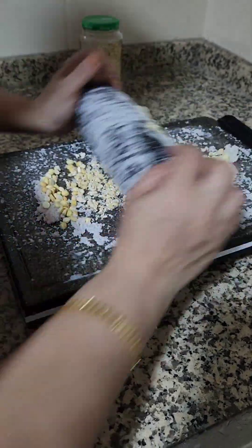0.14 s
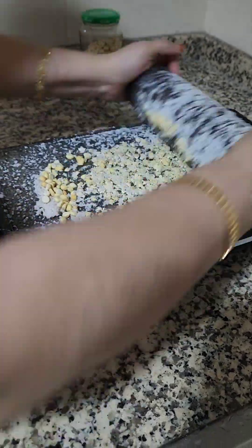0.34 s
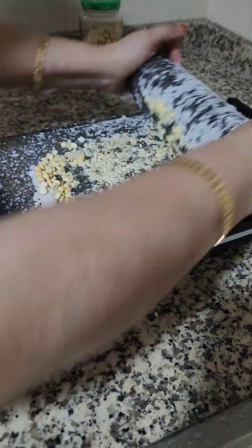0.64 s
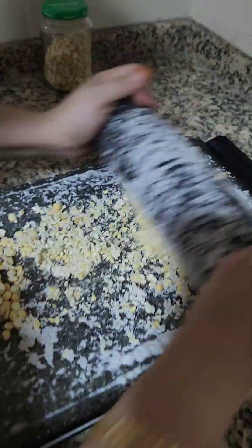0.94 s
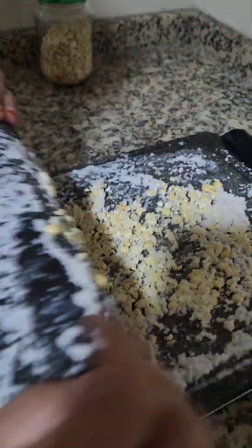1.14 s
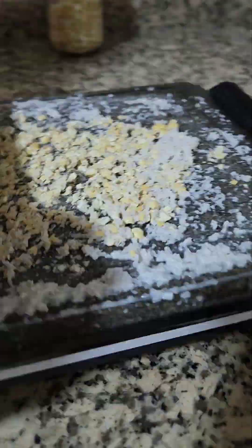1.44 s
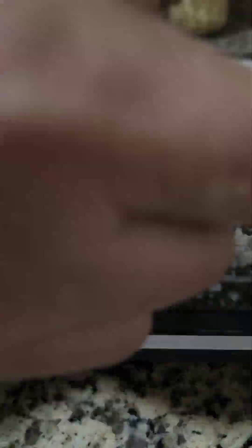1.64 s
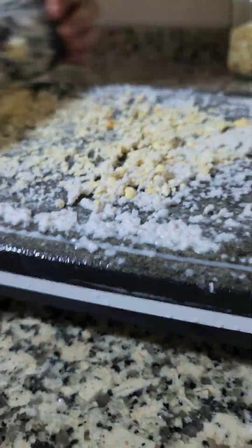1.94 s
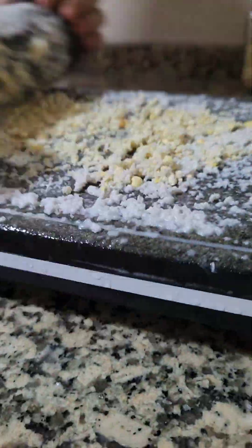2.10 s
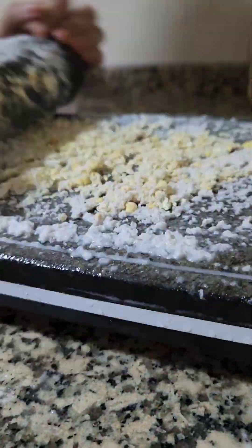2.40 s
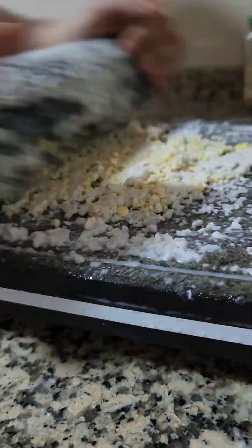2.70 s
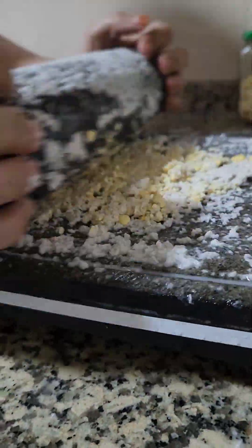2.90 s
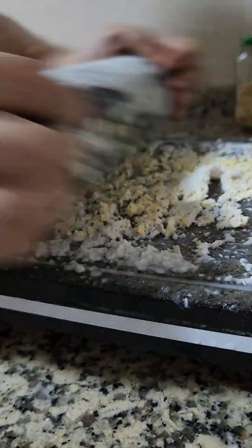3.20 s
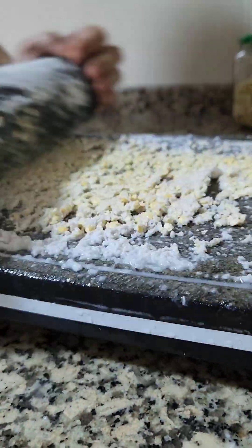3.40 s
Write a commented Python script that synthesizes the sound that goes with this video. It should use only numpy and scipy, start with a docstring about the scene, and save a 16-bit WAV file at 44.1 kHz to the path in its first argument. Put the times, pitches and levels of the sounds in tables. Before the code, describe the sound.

Rapid low stone rumbles, faint grain crunch and hard clacks as a roller grinds meal

```python
"""A stone clinks in a hushed small kitchen, then a ridged roller grinds coarse meal on a stone slab. Each ridge
is a swelling shower of tiny impacts: slab rumble, grain crunch, powder fizz, faint stone ring. Single blows
make the knocks of the roller landing, a bright puff of powder with some landings, and a few small lone ticks.
Clinks are a catch plus fading chatter, exciting click, ring, thud and clack. Each layer passes through a short
two-channel room tail."""
import sys
import numpy as np
from scipy import signal
from scipy.fft import rfft, irfft, next_fast_len
from scipy.io import wavfile

SR = 44100
rng = np.random.default_rng(int(sys.argv[2]) if len(sys.argv) > 2 else 0)


def inscribe(sig):
    """Save sig as 16-bit PCM at rate SR to the path in sys.argv[1].

    A 1-D sig is mono; a 2-D sig holds one channel per row.
    Samples are clipped to [-1, 1] before scaling.
    """
    pcm = np.round(np.clip(np.atleast_2d(sig).T, -1, 1) * 32767)
    wavfile.write(sys.argv[1], SR, pcm.astype(np.int16))


N = 156555

# Levels are relative: layer gains and the room follow; spectra are scaled to energy 1.
# Ridges rolling over the meal: start_s, length_s, rumble_db, crunch_db, fizz_db, ring_db
RIDGES = [(0.105, 0.082, -29, -51.5, -56.5, -49.5), (0.212, 0.046, -22, -56, -54.5, -51),
          (0.281, 0.1, -27, -51.5, -55, -55.5), (0.365, 0.075, -26, -49.5, -54.5, -62),
          (0.442, 0.093, -22.5, -49, -55.5, -52.5), (0.521, 0.063, -23.5, -50.5, -53, -46),
          (0.597, 0.056, -25, -48.5, -54.5, -53), (0.661, 0.061, -20.5, -46.5, -52, -47.5),
          (0.736, 0.055, -27, -52.5, -54, -47.5), (0.826, 0.016, -34.5, -54.5, -63, -56),
          (0.977, 0.079, -24.5, -49, -49.5, -52), (1.074, 0.06, -22, -49, -53, -50),
          (1.153, 0.096, -26, -49.5, -52.5, -50), (1.23, 0.051, -22, -48, -50, -41.5),
          (1.316, 0.056, -23.5, -46.5, -55, -44.5), (1.384, 0.061, -22.5, -47.5, -51.5, -45),
          (1.47, 0.053, -23, -46.5, -56.5, -57), (1.542, 0.028, -17.5, -47.5, -50.5, -40),
          (1.61, 0.042, -23, -45.5, -53.5, -52), (1.669, 0.028, -24.5, -52.5, -61, -57),
          (1.985, 0.036, -26, -48, -51.5, -60), (2.037, 0.026, -26, -49.5, -56, -56),
          (2.119, 0.04, -22.5, -40, -50, -66), (2.172, 0.043, -21.5, -46, -50.5, -34.5),
          (2.27, 0.052, -23, -51, -62, -70), (2.338, 0.054, -22.5, -46, -55.5, -49),
          (2.433, 0.045, -22.5, -43.5, -57, -55), (2.499, 0.05, -21.5, -44, -55, -46),
          (2.599, 0.043, -23.5, -51, -54.5, -50), (2.667, 0.044, -23, -44, -54, -46.5),
          (2.759, 0.039, -25.5, -50.5, -56, -52), (2.829, 0.044, -24.5, -48.5, -52.5, -43),
          (2.935, 0.0085, -37, -68, -71, -83), (3.095, 0.078, -28.5, -50, -57.5, -57),
          (3.178, 0.031, -19, -43.5, -48.5, -46.5), (3.254, 0.047, -24, -46.5, -55.5, -56),
          (3.331, 0.038, -25, -49.5, -56, -47.5), (3.414, 0.036, -25, -51, -55.5, -57),
          (3.475, 0.058, -26, -52.5, -60, -58)]
# Roller landing: start_s, slab_db, crunch_db
KNOCKS = [(0.108, -18.5, -46), (0.226, -29, -49), (.946, -15, -42.5), (1.265, -20, -49), (1.473, -19, -44),
          (1.566, -24.5, -53), (1.613, -18, -42.5), (1.983, -22, -48), (3.054, -18.5, -45),
          (3.413, -19.5, -42), (3.477, -24, -52)]
# Stone biting through to stone: start_s, scrape_s, click_db, ring_db, thud_db
CLINKS = [(.008, 0.0025, -45.5, -52.5, -32), (0.123, 0.0033, -45, -48, -36),
          (0.4898, 0.0037, -34, -59, -28.5), (0.627, 0.0067, -50.5, -48, -35.5),
          (0.659, 0.0052, -53, -49, -33), (0.9802, 0.0032, -40, -37.5, -30.5),
          (.988, 0.0034, -40.5, -36, -40), (1.23, 0.002, -45, -46, -34), (1.546, .006, -45.5, -43.5, -34),
          (1.814, 0.0016, -33.5, -44, -28), (1.953, 0.0016, -38, -50, -25), (1.981, 0.0038, -43, -43, -24),
          (2.011, 0.0033, -50, -37, -42), (2.136, 0.0045, -41.5, -38, -28), (2.1694, 0.0046, -40, -59, -32),
          (2.3001, 0.0011, -25.5, -26, -28), (2.346, 0.0027, -41.5, -48, -29),
          (2.463, 0.0083, -38.5, -38.5, -32), (2.6309, 0.0039, -42, -47, -28.5),
          (2.788, 0.0097, -39.5, -39, -27), (2.842, 0.0074, -38.5, -43, -31)]
# Bright ticks: a puff of powder as the roller lands, plus a few small lone ticks: start_s, level_db
SNAPS = [(.108, -58), (.285, -50), (.834, -58), (.946, -49), (.978, -46), (1.318, -57), (1.473, -63),
         (3.054, -57), (3.413, -58)]

# Slab on the worktop: freq_hz, level_db
SLAB_SPECTRUM = [(25, -43.5), (70, -46), (115, -31.5), (150, -20), (176, -9.5), (200, -14), (230, -5),
                 (275, 4), (300, 0.5), (315, 2), (335, 0.5), (365, -2.5), (400, 0.5), (432, -4.5),
                 (460, -7), (485, -4), (515, -3), (555, -10), (630, -24.5), (740, -26), (850, -24.5),
                 (950, -46), (1300, -53.5), (3000, -45), (16000, -110)]
# Slab tilt by where the roller bears: time_s, tilt_db_per_octave
SLAB_TILT = [(.1, -4), (.8, -1.5), (1.1, -2), (1.6, 2.5), (2.1, 1.5), (2.8, 1), (3.2, 0.5), (3.5, 4)]
# Slab upper modes: freq_hz, t60_s, level_db
SLAB_MODES = [(795, 0.036, 0.5), (838, 0.11, 1.5), (1101, 0.11, -2.5), (1232.7, .14, 0), (2240, 0.11, -8),
              (2600, 0.073, -17)]
# Upper-mode level over the ridge's rumble: time_s, level_db
MODES_OVER_RUMBLE = [(.1, -33), (.8, -33), (1.5, -37), (2.1, -26), (2.8, -25), (3.5, -25)]
# Hard blow on the slab: freq_hz, level_db
THUD_SPECTRUM = [(30, -24), (130, -11), (280, 4), (500, 3), (650, -7), (830, -2.5), (980, -20.5),
                 (1250, -19.5), (1600, -28), (4000, -35.5), (16000, -93)]
# Shaking worktop: freq_hz, level_db
WORKTOP_SPECTRUM = [(20, -2), (50, -1), (90, -1), (200, -9), (1000, -65)]
# Breaking grains: freq_hz, level_db
CRUNCH_SPECTRUM = [(300, -40), (800, 6), (980, 3.5), (1230, 7), (1400, 3.5), (1950, 0.5), (2230, 7),
                   (2650, -7.5), (3230, 5.5), (3900, -8.5), (4300, -9), (4900, -12.5), (6000, -9),
                   (7300, -28), (8500, -14), (11000, -51)]
# Powder: freq_hz, level_db
FIZZ_SPECTRUM = [(1500, -18), (5000, -4), (8500, -2), (10500, -2), (14000, -1), (15400, 4), (15800, -11),
                 (17000, -44)]
# Stone click: freq_hz, level_db
CLICK_SPECTRUM = [(400, -14), (1200, -1.5), (1550, -6.5), (2500, -4), (2950, 5.5), (3220, 6), (3550, 1.5),
                  (3880, -5), (4230, 1), (4700, -9), (6200, -6), (6850, -4), (7300, -1.5), (7900, -7.5),
                  (8800, -41), (16000, -20)]
# High modes of the stone: freq_hz, t60_s, rubbed_db, struck_db
STONE_MODES = [(7595, 0.06, -20, 6), (7845, 0.068, -6, -18.5)]
# Struck roller's middle modes: freq_hz, t60_s, level_db
CLACK_MODES = [(2955, 0.066, -7), (3180, 0.075, 2), (3244, 0.075, 0.5), (3520, .06, -6), (4260, .06, -9.5),
               (6860, 0.057, -10)]
# Room tone: freq_hz, level_db
HUSH_SPECTRUM = [(15, -69), (25, -23.5), (363, -3.5), (1330, -22.5), (1940, -30), (2110, -32.5),
                 (4250, -32.5), (4740, -33), (6740, -35), (8590, -35), (16000, -47)]
# Kitchen decay: freq_hz, t60_s
KITCHEN_DECAY = [(150, 0.32), (400, 0.18), (1000, 0.13), (3000, 0.11), (8000, 0.15), (15000, 0.17)]

HUSH_DB = -53.5
LEAD_S = 0.0046  # a ridge starts to bite before it takes the weight
CRUNCH_LAG_S = 0.002  # crunch, fizz and rub trail the rumble
BUMPS_PER_S, GRAINS_PER_S, DUST_PER_S, RUBS_PER_S = 420, 2200, 7600, 460
SCRAPES_PER_S = 2500
BLOW_S = 0.0082  # a blow's level is its rms over this time
CATCH_DB = 6.5  # first contact of a scrape over the start of its chatter
CLACK_DB = -5.5  # relative to the click level
TOP_HZ = 16000


def amp(db):
    """Decibels to gain."""
    return 10 ** (np.asarray(db) / 20)


def along(points, hz):
    """Interpolates (freq_hz, value) points on a log frequency axis."""
    point_hz, value = np.transpose(points)
    return np.interp(np.log(hz + 1), np.log(point_hz + 1), value)


def unit(x):
    """Scales to energy 1."""
    return x / np.sqrt(np.sum(x ** 2, axis=-1, keepdims=True) + 1e-20)


def add(track, start_s, x):
    """Mixes x into the track at start_s."""
    i = max(round(start_s * SR), 0)
    track[i:i + len(x)] += x[:max(N - i, 0)]


def body(spectrum, size=4096):
    """Minimum-phase impulse response of a body with this spectrum, by folding the cepstrum."""
    cepstrum = irfft(np.log(amp(along(spectrum, np.fft.rfftfreq(size, 1 / SR)))))
    cepstrum[1:size // 2] *= 2
    cepstrum[size // 2 + 1:] = 0
    return unit(irfft(np.exp(rfft(cepstrum))))


def ringing(modes, samples):
    """Sum of exponentially decaying sine modes (freq_hz, t60_s, level_db)."""
    t = np.arange(samples) / SR
    return sum(amp(db - 60 * t / t60_s) * np.sin(2 * np.pi * hz * t) for hz, t60_s, db in modes)


def kitchen(x, wet_db, apart, left_db):
    """Direct sound plus a decaying noise tail, redrawn each quarter second; 'apart' sets its side share."""
    out = np.zeros((2, N))
    for i in range(0, N, SR // 4):
        hz, _, z = signal.stft(rng.standard_normal((2, SR // 3)), SR, nperseg=256)
        t = np.arange(z.shape[-1]) * 128 / SR  # stft hop is half of nperseg
        decay = amp(-60 * t / along(KITCHEN_DECAY, hz)[:, None])
        mid, side = unit(signal.istft(z * decay, SR, nperseg=256)[1])
        for track, sign in zip(out, (1, -1)):
            tail = amp(wet_db) * unit(mid + sign * apart * side)
            answer = np.r_[1, np.zeros(SR // 300), tail]
            add(track, i / SR, signal.fftconvolve(x[i:i + SR // 4], unit(answer)))
    return out * amp([[left_db / 2], [-left_db / 2]])


def room_tone():
    """Quiet, dull hush of the kitchen: noise shaped by a spectrum."""
    noise = signal.fftconvolve(rng.standard_normal(N), body(HUSH_SPECTRUM))[:N]
    return amp(HUSH_DB) * kitchen(noise, wet_db=-9.0, apart=1.0, left_db=0.6)


def blows(rows, response):
    """Single impacts (start_s, level_db) into one response."""
    track = np.zeros(N)
    for start_s, db in rows:
        add(track, start_s, amp(db) * np.sqrt(BLOW_S * SR) * response)
    return track


def snaps():
    """Bright ticks: a puff of powder with some landings, and small lone ticks."""
    return kitchen(blows(SNAPS, body(FIZZ_SPECTRUM)), wet_db=7, apart=1.8, left_db=5.0)


def contacts(size, per_s, scatter_db):
    """Tiny impacts at random moments and signs; gains in dB scatter exponentially with this mean."""
    chance, sign, spread = rng.random((3, SR // 2))[:, :size]
    gain = amp(-scatter_db * np.log(1 - spread))
    return (chance < per_s / SR) * np.sign(sign - 0.5) * gain


def scrapes(levels_db, response):
    """Each clink is one catch followed by quickly fading chatter."""
    track, t = np.zeros(N), np.arange(SR // 20) / SR
    for (start_s, scrape_s, *_), db in zip(CLINKS, levels_db):
        fade = np.exp(-(t / scrape_s / 2) ** 2)
        chatter = contacts(len(t), SCRAPES_PER_S, scatter_db=0.0) * fade
        chatter[0] = amp(CATCH_DB)
        sound = unit(signal.fftconvolve(chatter, response))
        add(track, start_s, amp(db) * np.sqrt(BLOW_S * SR) * sound)
    return track


def clack():
    """Each clink also rings the roller's middle modes."""
    levels_db = np.transpose(CLINKS)[2] + CLACK_DB
    return kitchen(scrapes(levels_db, ringing(CLACK_MODES, SR // 10)), wet_db=-3.5, apart=0.73, left_db=5)


def stone_ring(struck):
    """High modes of the stone; striking and rubbing weight them differently."""
    modes = [(hz, t60_s, struck_db if struck else rubbed_db)
             for hz, t60_s, rubbed_db, struck_db in STONE_MODES]
    return unit(ringing(modes, SR // 10))


def clinks():
    """Stone meets stone: a click, a high ring and a slab thud."""
    click_db, ring_db, thud_db = np.transpose(CLINKS)[2:]
    click = scrapes(click_db, body(CLICK_SPECTRUM))
    ring = scrapes(ring_db, stone_ring(struck=True))
    thud = scrapes(thud_db, body(THUD_SPECTRUM))
    return (amp(3.0) * kitchen(click, wet_db=1, apart=2.14, left_db=1.5)
            + amp(2.5) * kitchen(ring, wet_db=-3, apart=3.8, left_db=3.5)
            + amp(1.5) * kitchen(thud, wet_db=-2, apart=0.13, left_db=2.0))


def knocks():
    """The roller's weight drops on the slab, cracks the grains beneath and shakes the worktop."""
    start_s, slab_db, crunch_db = np.transpose(KNOCKS)
    knock = blows(zip(start_s, slab_db), body(SLAB_SPECTRUM))
    crack = blows(zip(start_s, crunch_db), body(CRUNCH_SPECTRUM))
    shake = blows(zip(start_s, slab_db), body(WORKTOP_SPECTRUM))
    return (kitchen(knock, wet_db=-5, apart=0.12, left_db=1.6)
            + amp(1.0) * kitchen(crack, wet_db=13, apart=0.72, left_db=2)
            + amp(-34) * kitchen(shake, wet_db=-9, apart=1.4, left_db=3.5))


def rolling(levels_db, response_at, per_s, scatter_db, attack_s, release_s, sag_db, lag_s):
    """Under each ridge a shower of contacts swells, sags and dies, exciting the response at that moment."""
    track = np.zeros(N)
    for (start_s, length_s, *_), db in zip(RIDGES, levels_db):
        t = np.arange(int((length_s + LEAD_S + 5 * release_s) * SR)) / SR
        swell = np.minimum(t / attack_s, 1)
        sag = amp(-sag_db * np.minimum(t / length_s, 1) ** 2)
        release = np.exp(-np.maximum(t - LEAD_S - length_s, 0) / release_s)
        shower = contacts(len(t), per_s, scatter_db) * swell * sag * release
        sound = unit(signal.fftconvolve(shower, response_at(start_s)))
        # level = rms over the ridge's length
        add(track, start_s - LEAD_S + lag_s, amp(db) * np.sqrt(length_s * SR) * sound)
    return track


def slab_ring():
    """The rolling also stirs the slab's upper modes."""
    start_s, _, rumble_db = np.transpose(RIDGES)[:3]
    modes = ringing(SLAB_MODES, SR // 6)
    levels_db = rumble_db + np.interp(start_s, *np.transpose(MODES_OVER_RUMBLE))
    ring = rolling(levels_db, lambda s: modes, BUMPS_PER_S, scatter_db=2.5,
                   attack_s=0.012, release_s=0.0044, sag_db=8.5, lag_s=0)
    return kitchen(ring, wet_db=-4.5, apart=0.8, left_db=0)


def slab(time_s):
    """Slab response, deeper or harder with the roller's place; the tilt stops at the lowest upper mode."""
    tilt_db = np.interp(time_s, *np.transpose(SLAB_TILT))
    top_hz = SLAB_MODES[0][0]
    return body([(hz, db + tilt_db * np.log2(min(hz, top_hz))) for hz, db in SLAB_SPECTRUM])


def rub(ring_db):
    """Rubbing contacts excite the stone's high modes."""
    track = rolling(ring_db, lambda s: stone_ring(struck=False), RUBS_PER_S, scatter_db=1,
                    attack_s=0.024, release_s=0.005, sag_db=27.5, lag_s=CRUNCH_LAG_S)
    return amp(-4.26) * kitchen(track, wet_db=-2.0, apart=1.9, left_db=0.5)


def fizz(fizz_db):
    """Smeared powder: a dense, bright shower."""
    track = rolling(fizz_db, lambda s: body(FIZZ_SPECTRUM), DUST_PER_S, scatter_db=3.5,
                    attack_s=0.015, release_s=0.0065, sag_db=19.5, lag_s=CRUNCH_LAG_S)
    return amp(1.5) * kitchen(track, wet_db=4, apart=2.1, left_db=1.5)


def crunch(crunch_db):
    """Grains crack under the ridge."""
    track = rolling(crunch_db, lambda s: body(CRUNCH_SPECTRUM), GRAINS_PER_S, scatter_db=3.0,
                    attack_s=0.016, release_s=0.011, sag_db=10.5, lag_s=CRUNCH_LAG_S)
    return amp(-1.8) * kitchen(track, wet_db=1.5, apart=1.22, left_db=0.0)


def rumble(rumble_db):
    """Ridges bump the slab."""
    track = rolling(rumble_db, slab, BUMPS_PER_S, scatter_db=1.57,
                    attack_s=0.012, release_s=0.013, sag_db=7.5, lag_s=0)
    return amp(0.13) * kitchen(track, wet_db=-10, apart=0.1, left_db=1.6)


def grinding():
    """Each ridge bumps the slab, cracks grains, smears powder and rubs the stone."""
    rumble_db, crunch_db, fizz_db, ring_db = np.transpose(RIDGES)[2:]
    return rumble(rumble_db) + crunch(crunch_db) + fizz(fizz_db) + rub(ring_db)


def scene():
    """Sums all layers in both channels."""
    return room_tone() + snaps() + clack() + clinks() + knocks() + slab_ring() + grinding()


def record(dry):
    """Band limit: removes everything from TOP_HZ up."""
    size = next_fast_len(N + SR // 2)
    keep = np.fft.rfftfreq(size, 1 / SR) < TOP_HZ
    return irfft(rfft(dry, size) * keep, size)[:, :N]


dry = scene()
out = record(dry)
inscribe(out)
```